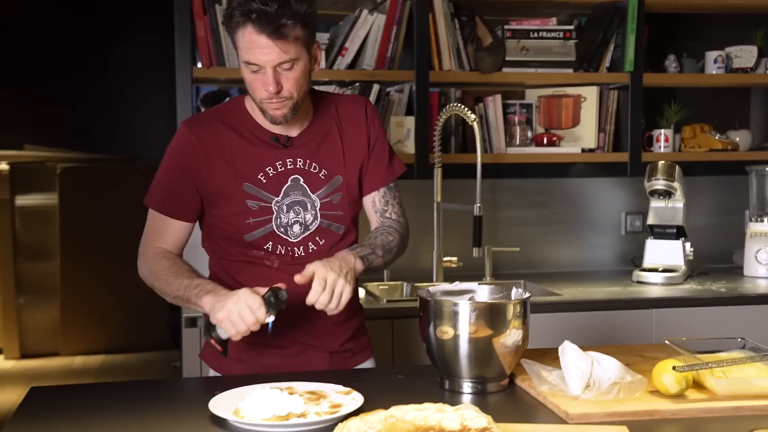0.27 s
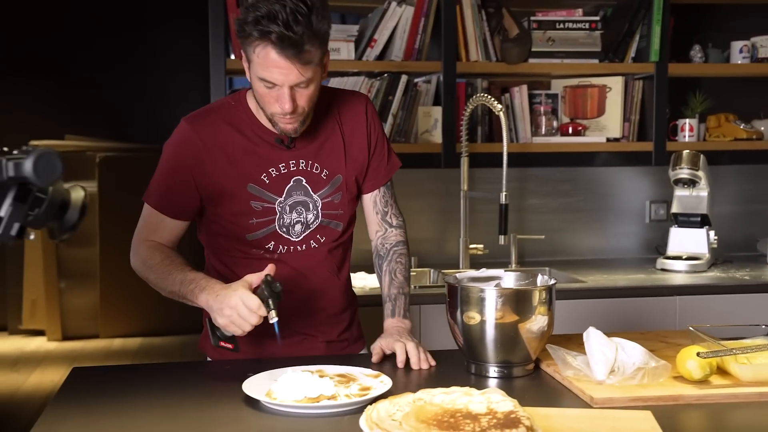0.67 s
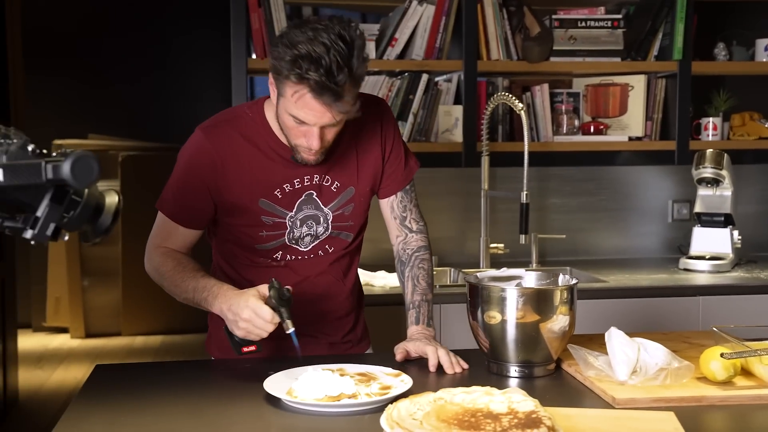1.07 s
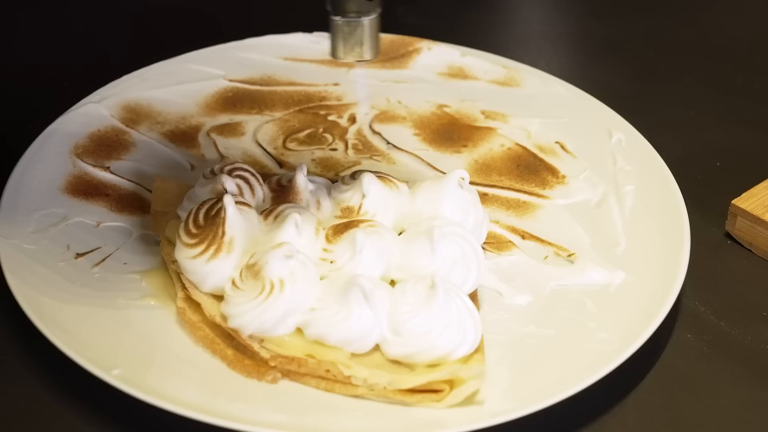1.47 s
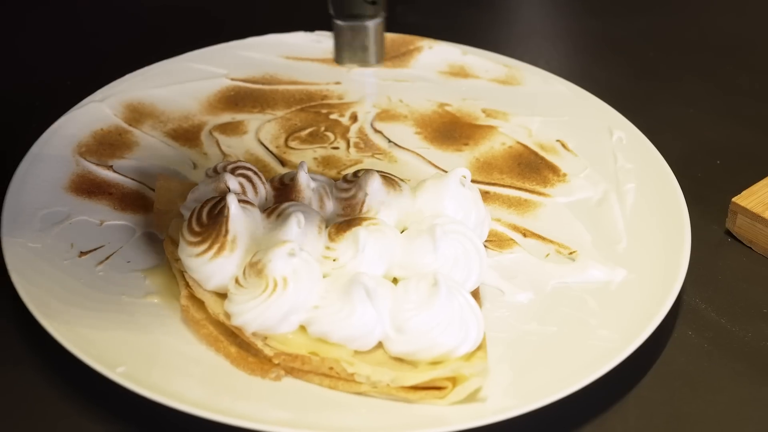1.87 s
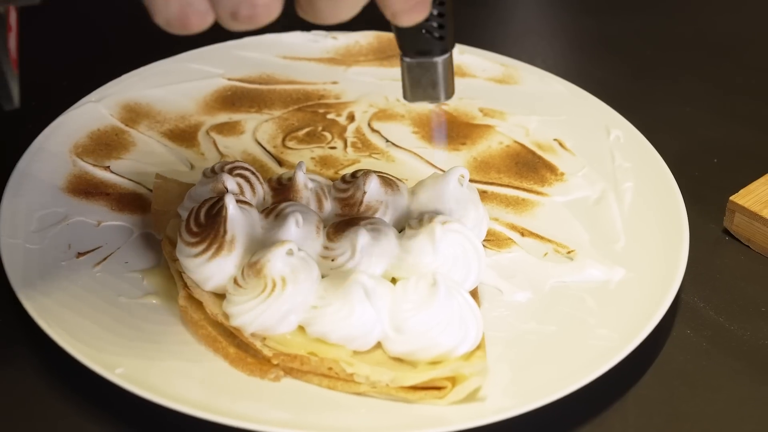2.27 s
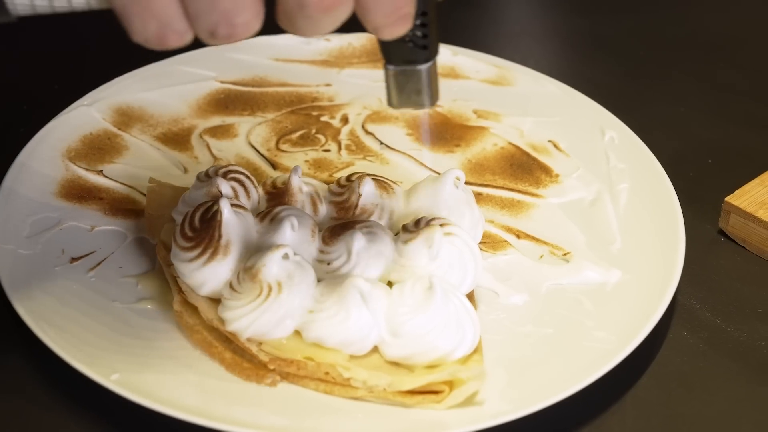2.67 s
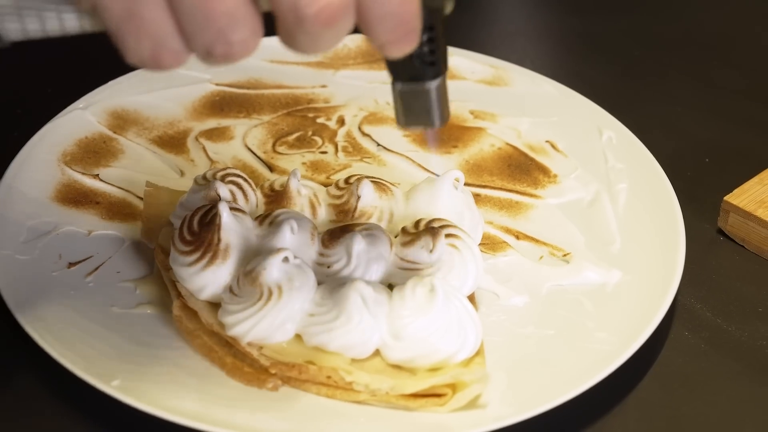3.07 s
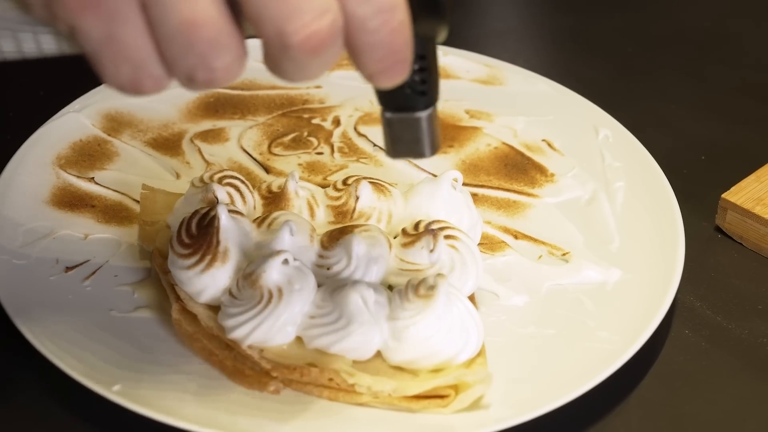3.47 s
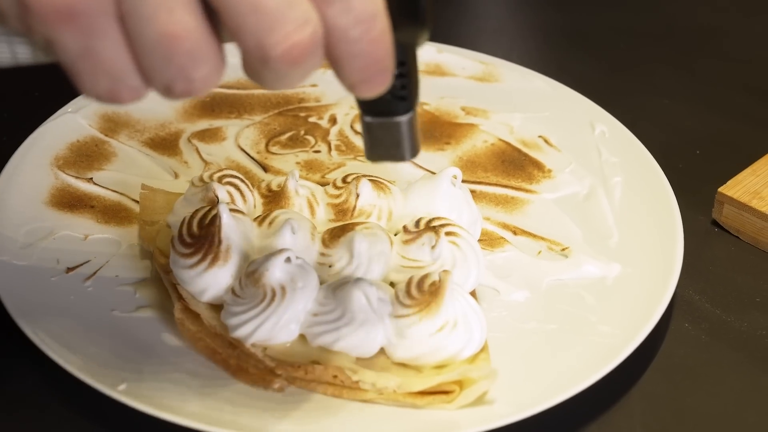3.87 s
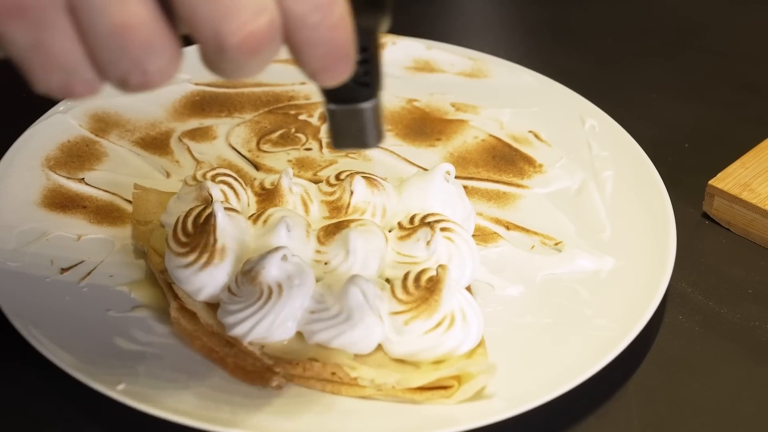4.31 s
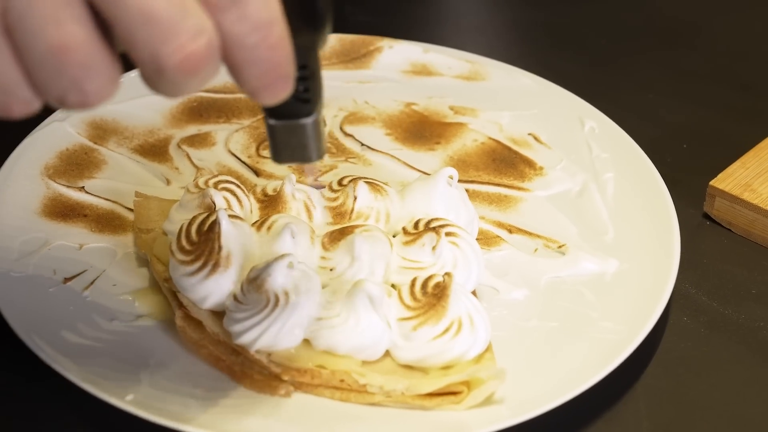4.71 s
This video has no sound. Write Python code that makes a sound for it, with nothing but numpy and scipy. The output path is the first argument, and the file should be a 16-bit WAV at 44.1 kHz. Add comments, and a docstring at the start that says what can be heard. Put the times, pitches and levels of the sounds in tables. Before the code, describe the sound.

In a quiet, dry kitchen, a handheld torch hisses faintly with unlit gas, then its igniter gives one loud, crisp snap. A soft flame burns at a distance. Around a second and a half the sound jumps close, and the jet breaks into short, fluttering roars on meringue, dropping to a gentle burn between them.

```python
"""In a dry kitchen, a blowtorch hisses with unlit gas, its igniter snaps, and a small jet flame burns softly.
From about 1.45 s the torch is heard from close by, sweeping over meringue: where the jet meets the peaks
it breaks into a fluttering roar, and between them it falls back to a soft burn.
Flame and gas are coloured noise that sways at random; snaps and ticks ring the torch body and wake the room;
bumps of the hands, ventilation and mains hum lie beneath. Both channels carry the same scene."""
import sys
import numpy as np
from scipy import signal
from scipy.fft import rfft, irfft, next_fast_len
from scipy.io import wavfile
from scipy.ndimage import map_coordinates

SR = 44100
rng = np.random.default_rng(int(sys.argv[2]) if len(sys.argv) > 2 else 0)


def store_wav(level_fs):
    """Save 16-bit WAV to argv[1]."""
    pcm = np.round(np.clip(np.atleast_2d(level_fs), -1, 1) * 32767)
    wavfile.write(sys.argv[1], SR, pcm.T.astype(np.int16))


N = 218098

LIT_S, CLOSE_S = 0.217, 1.452  # the flame starts to catch; the torch is heard from close by

# where the jet meets a peak of meringue: t/s, length/s, level/dB, extra rasp/dB, extra spray/dB
PEAK_CONTACTS = [(1.503, 0.098, -37.5, -1, -1.5), (1.624, 0.073, -46.5, 0, .5), (1.699, 0.057, -38, -1, -2),
                 (1.951, 0.045, -45.5, -1.5, -2), (2.074, 0.27, -39, -1, -2),
                 (2.38, .173, -38.5, -0.5, -2.5), (2.576, 0.031, -36.5, -0.5, -1),
                 (2.884, 0.1, -38.5, -1, -1.5), (3.003, .1, -40, -2.5, -0.5),
                 (3.126, 0.03, -39.5, 2.5, 0.5), (3.502, 0.029, -45.5, -1, -1),
                 (3.568, 0.0097, -48.5, 2, -1.5), (3.841, 0.022, -59.5, 0.5, 2),
                 (3.992, 0.06, -41.5, 2.5, -1.5), (4.064, 0.16, -42, 6, -0.5), (4.235, 0.025, -37.5, 2, 1),
                 (4.327, 0.038, -39, 4, 3), (4.455, 0.12, -40.3, 1, 2), (4.685, 0.18, -38.5, 1.5, 1)]
ATTACK_S, RELEASE_S, EDGE_POWER = 0.019, 0.024, 1.09  # turbulence builds and dies ever more steeply
SURGE_DB, SURGE_HZ = 0.63, 21.6  # slow unsteadiness within a contact
ROAR_DB, RASP_DB, SPRAY_DB, RUMBLE_DB = 1.23, -14, -17.5, -24  # against a contact's level
FULL_CONTACT_DB, SPRAY_FOLLOWS = -43.5, 0.74  # the spray swings less than the roar

# colours of the striking flame, low to high: f/Hz, relative level per Hz/dB
ROAR_COLOUR = [(60, -22), (100, -31.5), (175, -12), (260, -3.5), (340, -1.5), (430, -3), (540, 1.5),
               (700, -1.5), (860, -1), (1000, -9), (1130, -6), (1270, -10.5), (1480, -11.5), (1800, -23)]
RASP_COLOUR = [(1300, -6), (1650, 2.5), (2100, -0.5), (2800, 1), (3400, -4.5), (3900, -5), (4500, -8.5),
               (5200, -18), (6500, -16)]
SPRAY_COLOUR = [(4000, -22), (5100, -6.5), (5800, -1.5), (7400, 2.5), (8800, -3), (11500, -5.5),
                (13000, -8), (14200, -10.5), (16000, -21)]
# low puffs as the jet spills over the plate: t/s, length/s, level/dB
SPILL_PUFFS = [(1.634, 0.16, -58.5), (4.006, .05, -61)]
# echo off the plate, set by the nozzle's height: t/s, extra path/m, strength/0-1
PLATE_ECHO = [(1.5, .24, 0.36), (2.1, 0.232, 0.23), (3.6, 0.17, 0.13), (3.97, .081, .18),
              (4.28, 0.084, 0.26), (4.34, 0.148, 0.1), (4.8, 0.141, 0.63)]
# hollow notes of the flame over the counter: f/Hz, width/Hz, relative level/dB
HOLLOW_NOTES = [(117, 14.6, 12.5), (620, 69, 0), (1009, 9.2, 0), (1389, 29, 1)]

# colours of the free flame, its edge, and the flame close by: f/Hz, relative level per Hz/dB
FAR_FLAME_COLOUR = [(50, -16), (90, -7), (170, -1.5), (300, 1.5), (380, -1), (470, 2.5), (620, -3.5),
                    (740, -6), (880, -6.5), (1100, -35)]
FLAME_EDGE_COLOUR = [(800, -29), (1050, -4.5), (1230, 1.5), (1400, -6.5), (1580, -2.5), (1900, -9),
                     (2250, -9.5), (2700, -18.5), (3600, -24.5), (5000, -19)]
NEAR_FLAME_COLOUR = [(50, -21), (85, -15), (170, -9), (260, -1), (430, -0.5), (540, 2.5), (620, -1.5),
                     (780, -2), (1000, -14), (1220, -12.5), (1700, -21), (2300, -32), (3400, -31),
                     (4500, -35)]
# free flame from across the counter: level at lighting/dB, drift/dB per s
BURN_DB, BURN_DB_PER_S = -57.5, 5
EDGE_DB, EDGE_DB_PER_S = -56, -7.5
FLARE_S, FLARE_LENGTH_S, FLARE_DB = 0.99, 0.026, 1  # one brief flare

# colours of the gas, unlit and lit: f/Hz, relative level per Hz/dB
COLD_GAS_COLOUR = [(1760, -61), (3000, -26), (5040, -5), (6900, -7.5), (7460, -10), (8580, -23),
                   (13800, -10), (16000, -28)]
LIT_GAS_COLOUR = [(3000, -5.5), (4600, 1.5), (7500, -2.5), (9500, 3), (12000, 3), (16000, -1)]
# bright bands of the hiss, far and near: f/Hz, width of each filter pass/Hz, relative level/dB
FAR_HISS_BANDS = [(4720, 260, -0.5), (6130, 490, -2), (7540, 1000, 3), (11360, 1200, 0), (13100, 850, -2),
                  (14800, 860, -12)]
NEAR_HISS_BANDS = [(4700, 540, -10.5), (5900, 600, -10), (8140, 1400, 1.5), (11200, 780, 0.5),
                   (13750, 800, -11), (15200, 700, -21)]
# how the bright bands stand out as the torch turns: t/s, prominence/dB, tilt/dB per octave
TORCH_TURN = [(.3, -6.5, -3), (1.12, 2.5, 2), (1.44, 4.5, -0.5), (1.5, 1, -6), (3.1, 1, -1),
              (3.3, 6.5, 1.5), (3.85, 0.5, -4), (4.02, 6.5, 13), (4.35, 11, 15), (4.65, -4, -8)]
COLD_GAS_DB, FAR_GAS_DB, NEAR_GAS_DB = -65.5, -65.5, -68.5  # gas leaving the nozzle
HISS_WANDER, HISS_SWELL_DB = 0.012, 2.8  # typical wavering of the bands: share of pitch, level

# the igniter's hammer lets go, hits the crystal and rebounds: t/s, blow level/dB
IGNITER_SNAP = [(.2197, -16.5), (.2211, -18), (.2223, -18.5)]
# fingers and trigger on the torch: t/s, blow level/dB
FINGER_TICKS = [(.184, -41.5), (.198, -42), (.444, -44), (.447, -46), (.5055, -44), (.5072, -29.5),
                (1.302, -47)]
# resonances of the torch body: f/Hz, width/Hz, relative level/dB
TORCH_BODY = [(112, 62, -8.5), (736, 99, 0.5), (1360, 83, 10), (2230, 85, 6), (2810, 160, -1),
              (4960, 500, 5), (6030, 390, 0), (6500, 210, 1), (7300, 230, 1), (9200, 300, -19),
              (10320, 440, 6), (11350, 230, -14), (11400, 300, 2), (13000, 400, 2.5), (15000, 900, -7)]
# dry crack of a contact: f/Hz, relative level per Hz/dB
CRACK_COLOUR = [(700, 3.5), (2600, -2), (3500, -11.5), (5000, -7), (13000, 0), (16000, 3)]
# soft bumps of the hands on the torch: t/s, blow level/dB
HAND_BUMPS = [(.015, -54), (.132, -45.5)]

# colour of the kitchen's reverberation: f/Hz, relative level per Hz/dB
WALL_COLOUR = [(100, 0.5), (500, -5.5), (1000, -1), (2400, 5), (3400, -1), (4300, 4), (6000, -2),
               (9000, -7), (15000, -13)]
# time for the reverberation to fall by 60 dB: f/Hz, time/s
WALL_DECAY = [(150, 1), (1000, 0.31), (4000, 0.34), (14000, 0.32)]
# colour of the faint ventilation: f/Hz, relative level per Hz/dB
ROOM_COLOUR = [(22, 10), (60, -22), (130, -11), (220, -4.5), (400, -4), (750, -9), (950, -2), (1120, -3),
               (1400, -9.5), (2200, -7), (3500, -17)]
ROOM_DB = -71
# mains hum: f/Hz, rms level/dB
MAINS_HUM = [(49.5, -78.5)]
CUTOFF_HZ = 15750


def striking_flame(eddy_db=1.25, sputter_db=1.0):
    """On the topping the jet turns turbulent: large eddies sway the roar, small ones make its top sputter."""
    strength, rasp_strength, spray_strength = turbulence()
    eddies = from_db(eddy_db * flutter(rate_hz=81))
    sputter = from_db(sputter_db * flutter(rate_hz=190))
    roar = strength * rms_one(hollow(noise(ROAR_COLOUR)) * eddies)
    rasp = rasp_strength * off_plate(noise(RASP_COLOUR) * eddies * sputter)
    spray = spray_strength * off_plate(noise(SPRAY_COLOUR) * sputter)
    puffs = sum(from_db(db) * envelope(start, length) for start, length, db in SPILL_PUFFS)
    rumble_strength = from_db(RUMBLE_DB) * spray_strength + puffs
    rumble = rumble_strength * noise([(65, -10), (120, 8.5), (170, 0)])
    return from_db(ROAR_DB) * roar + from_db(RASP_DB) * rasp + from_db(SPRAY_DB) * spray + rumble


def turbulence():
    """Strength of roar, rasp and spray: each follows its strongest contact and surges a little."""
    strength = np.zeros((3, N))
    full = from_db(FULL_CONTACT_DB)
    for start, length, db, rasp_db, spray_db in PEAK_CONTACTS:
        roar = from_db(db) * envelope(start, length)
        rasp = from_db(rasp_db) * roar
        spray = from_db(FULL_CONTACT_DB + spray_db) * (roar / full) ** SPRAY_FOLLOWS
        strength = np.maximum(strength, [roar, rasp, spray])
    return strength * from_db(SURGE_DB * flutter(rate_hz=SURGE_HZ))


def envelope(start, length):
    """The jet's turbulence builds just before the start, holds for the length, then dies away."""
    t = np.arange(N) / SR - start
    away = np.clip(np.maximum(-t / ATTACK_S, (t - length) / RELEASE_S), 0, 10)
    return np.exp(-away ** EDGE_POWER)


def off_plate(x):
    """The plate's delayed echo cuts notches in the sound that slide as the torch moves."""
    path_m, strength = in_time(PLATE_ECHO)
    delay = path_m / 343 * SR  # speed of sound in m/s
    return rms_one(x - strength * read_at(x, np.arange(N) - delay))


def hollow(x):
    """Resonances over the counter add hollow notes to a flame's noise; rms 1."""
    return rms_one(x + sum(resonate(x, [note]) for note in HOLLOW_NOTES))


def free_flame(lit, close, near_db=-57.5, flicker_db=1.3, sway_db=0.5):
    """The undisturbed flame: a soft, flickering burn that fills out and loses its edge after lighting."""
    t = np.arange(N) / SR
    since_lit = t - LIT_S
    flare_db = FLARE_DB * np.exp(-((t - FLARE_S) / FLARE_LENGTH_S) ** 2)
    burn_db = BURN_DB + BURN_DB_PER_S * since_lit + flare_db + sway_db * flutter(rate_hz=14)
    burn = from_db(burn_db) * noise(FAR_FLAME_COLOUR)
    edge = from_db(EDGE_DB + EDGE_DB_PER_S * since_lit) * noise(FLAME_EDGE_COLOUR)
    near = from_db(near_db) * hollow(noise(NEAR_FLAME_COLOUR))
    flicker = from_db(flicker_db * flutter(rate_hz=69))
    return lit * ((1 - close) * (burn + edge) + close * near) * flicker


def gas(lit, close, bands_db=-9.5, broad_db=-3.5):
    """The nozzle's hiss: broad noise with bright bands that shift with the angle it is heard from."""
    prominence_db, tilt_db = in_time(TORCH_TURN)
    wavering = np.arange(N) + np.cumsum(HISS_WANDER * flutter(rate_hz=4))  # uneven reading bends pitch
    broad = from_db(broad_db) * noise(LIT_GAS_COLOUR)
    band_gain = from_db(bands_db + prominence_db)
    far = broad + band_gain * read_at(hiss_bands(FAR_HISS_BANDS, tilt_db), wavering)
    near = broad + band_gain * read_at(hiss_bands(NEAR_HISS_BANDS, tilt_db), wavering)
    burning = (1 - close) * from_db(FAR_GAS_DB) * far + close * from_db(NEAR_GAS_DB) * near
    return (1 - lit) * from_db(COLD_GAS_DB) * noise(COLD_GAS_COLOUR) + lit * burning


def hiss_bands(bands, tilt_db):
    """Steep-sided bands of hiss, tilted about the middle of the treble; each swells by itself."""
    out = 0
    for hz, width, db in bands:
        once = resonate(rng.standard_normal(N), [(hz, width, 0)])
        twice = resonate(once, [(hz, width, 0)])  # a second pass steepens the sides
        level_db = db + tilt_db * np.log2(hz / 10000) + HISS_SWELL_DB * flutter(rate_hz=3.1)
        out = out + rms_one(twice) * from_db(level_db)
    return out


def clicks(events, crack_db, crack_s, ring_db, room_db, soft_hz):
    """Each contact rings the torch body, cracks for a moment and wakes the room."""
    blows = strikes(events)
    crack_fade = signal.lfilter([1], [1, -np.exp(-1 / (crack_s * SR))], blows + 1e-18)
    crack = from_db(crack_db) * crack_fade * noise(CRACK_COLOUR)
    ring = from_db(ring_db) * resonate(blows, TORCH_BODY)
    sound = ring + crack + from_db(room_db) * kitchen(blows)
    return signal.sosfilt(signal.butter(1, soft_hz, fs=SR, output="sos"), sound)


def handling():
    """Bumps of the hands excite one low resonance and sound dull."""
    return resonate(strikes(HAND_BUMPS), [(476, 65, 33.4)])


def strikes(events):
    """Each contact is a single impulse."""
    blows = np.zeros(N)
    for s, db in events:
        blows[round(s * SR)] += from_db(db)
    return blows


def surroundings(x, echo_db=-21, count=14):
    """Bowls, shelves and walls send back faint early echoes, mostly above the bass."""
    bright = signal.sosfilt(signal.butter(1, 1200, "high", fs=SR, output="sos"), x)
    lags = (rng.uniform(0.002, 0.02, count) * SR).astype(int)
    return x + from_db(echo_db) * sum(np.pad(bright, (lag, 0))[:N] for lag in lags)


def kitchen(blows):
    """Each blow leaves scattered reverberation that fades at its own pace in each band."""
    diffuse = (noise(WALL_COLOUR), noise(WALL_COLOUR))  # neighbouring bands use different noise
    tail = 0
    edges = np.geomspace(60, 17000, 9)
    for k, (low, high) in enumerate(zip(edges, edges[1:])):
        band_filter = signal.butter(2, [low, high], "band", fs=SR, output="sos")
        band = signal.sosfilt(band_filter, diffuse[k % 2])
        t60 = at_hz(WALL_DECAY, np.sqrt(low * high))
        keep = from_db(-60 / (SR * t60)) ** 2  # share of energy left after one sample
        energy = signal.lfilter([1 - keep], [1, -keep], blows ** 2 + 1e-18)
        tail = tail + band * np.sqrt(energy)
    return tail


def room_tone():
    """Faint ventilation is coloured noise; mains hum is a steady sine."""
    t = np.arange(N) / SR
    hum = 0
    for hz, db in MAINS_HUM:
        hum = hum + np.sqrt(2) * from_db(db) * np.sin(2 * np.pi * (hz * t + rng.random()))
    return from_db(ROOM_DB) * noise(ROOM_COLOUR) + hum


def noise(spectrum):
    """Noise of a given colour, falling steeply outside it; rms 1."""
    size = next_fast_len(N, True)
    hz = np.fft.rfftfreq(size, 1 / SR) + 1e-3
    skirts = np.minimum(1, np.minimum(hz / spectrum[0][0], spectrum[-1][0] / hz)) ** 4
    white = rfft(rng.standard_normal(size))
    return rms_one(irfft(white * from_db(at_hz(spectrum, hz)) * skirts, size)[:N])


def flutter(rate_hz):
    """Random swaying, mostly from a tenth of the rate up to the rate; rms 1."""
    return noise([(rate_hz / 10, 0), (rate_hz, 0)])


def resonate(x, modes):
    """Parallel resonances with alternating signs; a wider one dies sooner."""
    out = 0
    for k, (hz, width, db) in enumerate(modes):
        r = np.exp(-np.pi * width / SR)
        poles = [1, -2 * r * np.cos(2 * np.pi * hz / SR), r * r]
        ring = (1 - r * r) / 2 * signal.lfilter([1, 0, -1], poles, x + 1e-18)
        out = out + (-1) ** k * from_db(db) * ring
    return out


def read_at(x, samples):
    """Read a signal between its samples."""
    return map_coordinates(x, [samples], order=3, mode="mirror")


def in_time(rows):
    """Give each column of a curve at every sample."""
    s, *columns = np.transpose(rows)
    return [np.interp(np.arange(N) / SR, s, c) for c in columns]


def at_hz(points, hz):
    """Read a table on a log-frequency axis."""
    f, value = np.transpose(points)
    return np.interp(np.log(hz + 1e-3), np.log(f), value)


def after(start, rise):
    """Ramp from 0 to 1; both times in seconds."""
    return np.clip((np.arange(N) / SR - start) / rise, 0, 1)


def from_db(db):
    """Turn decibels into gain."""
    return 10 ** (np.asarray(db) / 20)


def rms_one(x):
    """Scale to unit power."""
    return x / np.sqrt(np.mean(x ** 2) + 1e-20)


def scene():
    """The torch and the room, alike in both channels."""
    lit = after(LIT_S, rise=0.09)
    close = after(CLOSE_S, rise=0.0039)
    torch = surroundings(close * striking_flame() + free_flame(lit, close) + gas(lit, close))
    snap = clicks(IGNITER_SNAP, crack_db=-10.0, crack_s=0.00078, ring_db=20.5, room_db=12.5, soft_hz=16700)
    ticks = clicks(FINGER_TICKS, crack_db=-1.0, crack_s=0.00083, ring_db=19, room_db=7, soft_hz=3950)
    mono = torch + snap + ticks + handling() + room_tone()
    return np.stack([mono, mono])


def record(dry, side_noise_db=-76):
    """A very faint noise, different left and right, lies under the scene; the top is cut steeply."""
    colour = [(20, 29), (60, 20), (250, 1), (1000, -16.0), (2000, -9), (15000, 3.5)]  # f/Hz, level/dB
    faint = np.stack([noise(colour) for channel in dry])
    top_cut = signal.ellip(10, 0.1, 80, CUTOFF_HZ, fs=SR, output="sos")
    return signal.sosfilt(top_cut, dry + from_db(side_noise_db) * faint)


dry = scene()
out = record(dry)
store_wav(out)
```